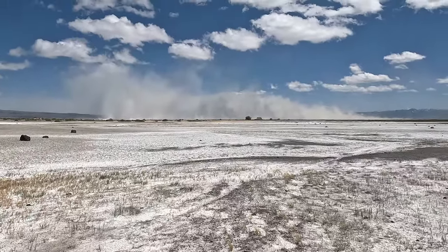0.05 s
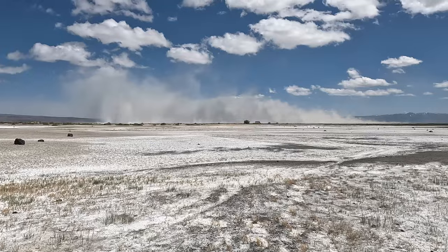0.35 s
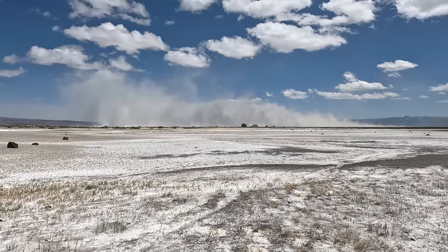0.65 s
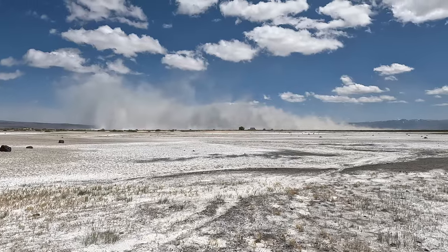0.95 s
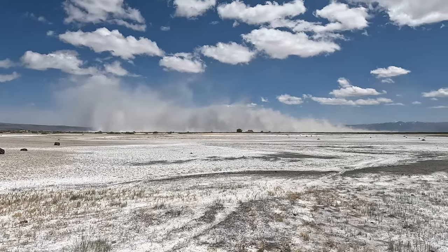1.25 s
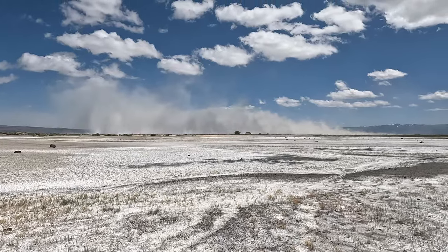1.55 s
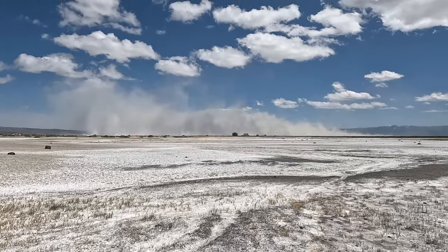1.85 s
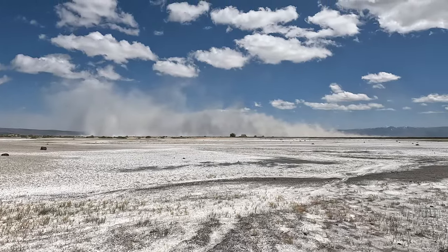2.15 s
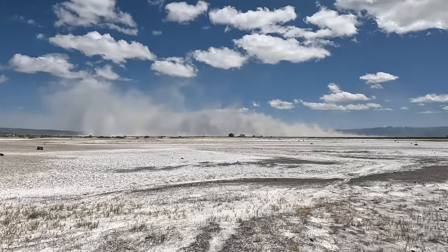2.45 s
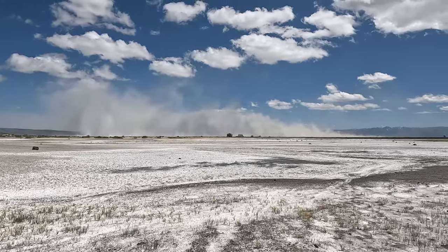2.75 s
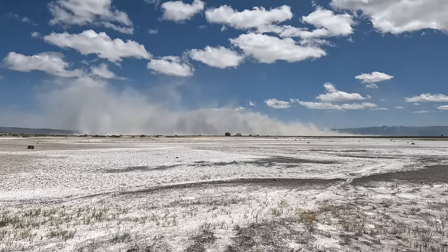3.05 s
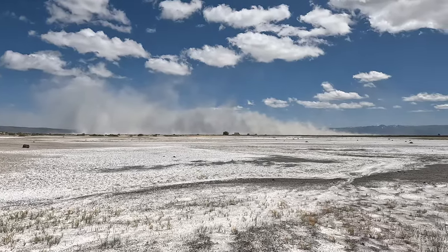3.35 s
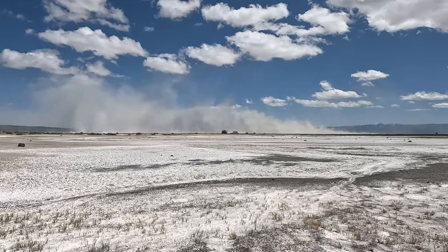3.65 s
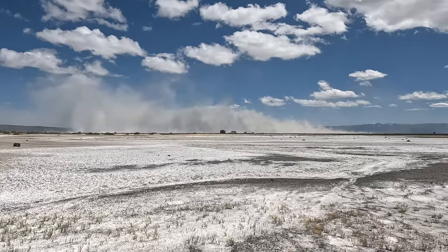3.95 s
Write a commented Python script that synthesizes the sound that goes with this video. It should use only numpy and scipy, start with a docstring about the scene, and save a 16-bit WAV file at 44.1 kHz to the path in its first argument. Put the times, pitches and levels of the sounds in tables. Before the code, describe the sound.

Someone walks over a brittle salt crust, each step crunching, with wind rumbling on the microphone.

```python
"""A dry salt flat in gusty wind, heard from a walker's small hand-held stereo recorder.
From the start, wind rumbles on the microphone ports and single eddies hit them with brighter buffets.
Steady steps follow just below: each crushes the crust into a crunch of tiny fractures, with sharper
snaps and a hiss of grit, and the trailing foot scuffs off. The wind slackens around the heavy third
step, gusts again, and eases after the heavy sixth."""
import sys
import numpy as np
from scipy import signal
from scipy.fft import rfft, irfft
from scipy.io import wavfile
from scipy.ndimage import uniform_filter1d, map_coordinates

SR = 44100
rng = np.random.default_rng(int(sys.argv[2]) if len(sys.argv) > 2 else 0)


def int16_out(signal):
    """Quantize to a 16-bit WAV file."""
    q = np.round(np.clip(np.atleast_2d(signal).T, -1, 1) * 32767)
    wavfile.write(sys.argv[1], SR, q.astype(np.int16))


N = 176400

# heel or forefoot crushes the crust:
# start t/s, attack/s, hold/s, release/s, crunch level/dB, grit level/dB, grit's treble boost/dB
FOOT_CONTACTS = [(0.256, 0.062, 0.05, 0.13, -43.5, -58, -8), (0.943, 0.012, 0.048, 0.039, -44, -56, -3),
                 (1.048, 0.023, 0.041, 0.052, -44, -57.5, -11),
                 (1.598, 0.043, 0.034, 0.0043, -38.5, -51, -4),
                 (1.69, 0.0024, 0.054, 0.05, -44.5, -58.5, -7),
                 (2.251, 0.0016, 0.0063, 0.061, -47.5, -62, -2),
                 (2.897, 0.011, 0.095, 0.038, -43.5, -57, -1.5),
                 (3.279, 0.0059, 0.0053, 0.0097, -65, -67.5, 14.5),
                 (3.535, 0.023, 0.12, 0.071, -38.5, -51.5, -23)]
# the sole rolls and the trailing foot scuffs off: start t/s, length/s, crunch level/dB, grit level/dB
FOOT_SCUFFS = [(0.01, 0.25, -61, -79), (0.465, 0.072, -48, -73.5), (0.583, 0.11, -60, -66),
               (.7, 0.35, -72, -77.5), (1.164, 0.17, -57, -72.5), (1.352, 0.1, -62, -79),
               (1.589, 0.018, -55, -57.5), (1.885, 0.15, -65, -66.5), (2.05, 0.087, -58.5, -68.5),
               (2.284, 0.052, -50.5, -70), (2.329, .29, -56.5, -71), (2.658, 0.22, -72, -78),
               (3.08, 0.13, -51.5, -71), (3.192, 0.25, -60, -67), (3.442, 0.17, -63, -71.5),
               (3.748, 0.076, -75, -59.5), (3.856, 0.093, -63, -64)]
# plates of crust snap: t/s, pulse level/dB, f/Hz, edge level/dB
PLATE_SNAPS = [(0.051, -25.5, 1410, -61), (0.078, -35.5, 1550, -77), (0.21, -36, 1550, -63),
               (.28, -32, 1500, -73.5), (.308, -40, 1400, -53), (.371, -17, 1004, -49),
               (.38, -39, 1900, -49), (.436, -17, 1110, -45), (.487, -34, 1970, -69),
               (.528, -34, 1550, -60), (.957, -48, 1500, -49), (.989, -22, 1010, -66),
               (1.0444, -22.5, 1090, -51.5), (1.067, -19.5, 1050, -58), (1.115, -40, 2130, -59),
               (1.123, -23.5, 1150, -59), (1.139, -36, 1900, -49), (1.283, -41.5, 2280, -48.5),
               (1.378, -32, 1220, -61), (1.443, -36.5, 1450, -68), (1.631, -24, 1330, -53),
               (1.654, -27, 1690, -40), (1.661, -41, 2500, -47), (1.671, -28.5, 2820, -42),
               (1.692, -29, 1990, -45), (1.729, -28.5, 1700, -56), (2.254, -51, 1600, -48.5),
               (2.28, -24.5, 1210, -58), (2.299, -32.5, 1190, -58), (2.512, -33, 1900, -50),
               (2.6, -30.5, 1210, -63), (2.637, -31, 1400, -58), (2.779, -42.5, 2700, -72),
               (2.926, -27.5, 1470, -65), (2.994, -13, 1100, -59), (3.094, -34, 1250, -52),
               (3.348, -40, 1900, -51.5), (3.403, -22, 1110, -57), (3.559, -33, 2500, -53),
               (3.622, -25.5, 740, -61), (3.639, -18, 980, -48), (3.662, -26, 2700, -60),
               (3.677, -27.5, 1250, -64), (3.717, -30, 2010, -57), (3.755, -27, 1310, -65),
               (3.783, -29.5, 2160, -60), (3.906, -31.5, 1520, -56)]
# spectra of the crunch, the grit and a snap's sharp edge: f/Hz, relative level/dB
CRUNCH_SPECTRUM = [(150, -36), (400, 3), (650, 1), (1000, 6), (1350, 4), (2100, -10), (3000, -14.5),
                   (5000, -33.5), (9000, -45), (15000, -62)]
GRIT_SPECTRUM = [(500, -25), (1500, -4), (2800, 0), (4200, -3.5), (5500, -8), (7300, -11), (8800, -20),
                 (10500, -24), (12300, -24), (14500, -42)]
EDGE_SPECTRUM = [(1200, -14), (2700, 2), (4200, 0), (7300, -7), (8600, -20), (14000, -42)]
# the feet at the right port against the left: f/Hz, level/dB
RIGHT_PORT_SHADE = [(200, 2), (500, -1), (900, -7), (2500, -8), (4000, -6.5), (5300, -2), (7500, -4),
                    (12000, -7)]
# how far the left port leads the right, for feet and for eddies: f/Hz, phase/rad
FEET_LEAD = [(100, 0), (780, -.7), (2400, -.8), (3800, 0), (5400, .4), (9000, .8)]
EDDY_LEAD = [(0, 0.34), (260, -1.08), (860, -1.83), (4000, 0.17)]
# eddies hit the ports:
# peak t/s, half length/s, right port level/dB, treble tilt/(dB per octave), left minus right/dB
EDDIES = [(0.01, 0.0033, -15.5, -0.5, -8.5), (0.053, 0.0049, -18.5, -14, -9),
          (0.079, 0.0065, -16.5, -5, -16), (0.111, 0.0073, -18, 3, -12), (0.337, 0.013, -17, -2.5, -9.5),
          (0.394, 0.016, -18, 0.5, -10.5), (0.718, 0.015, -23.5, -21.5, -11.5),
          (0.848, 0.0035, -17, -5, -7.5), (0.854, 0.0021, -19, -7.5, -3.5), (1.206, 0.013, -19, 2.5, -4.5),
          (1.234, .009, -21, -2, -8), (1.637, 0.0078, -26, -2.5, -1.5), (1.692, 0.0048, -23.5, -8, -9),
          (2.027, 0.0089, -22, -3, 1), (2.044, 0.0034, -19, -0.5, -11), (2.09, 0.0033, -20.5, -1.5, -6),
          (2.361, 0.013, -26.5, -18.5, -5.5), (2.391, 0.014, -22.5, -2.5, -10),
          (2.445, 0.015, -20, -10.5, -4), (2.474, 0.015, -22.5, 1.5, -4.5), (2.518, 0.026, -27.5, -7, -8),
          (2.815, 0.0087, -18.5, 3, -2), (2.835, 0.013, -20.5, -5, -20), (2.868, 0.0051, -15, -2.5, -7),
          (2.9, 0.023, -26.5, -2.5, -7.5), (2.972, 0.0056, -15.5, -12.5, -9),
          (3.008, 0.0077, -17.5, 1.5, -12), (3.054, 0.021, -16, -1, -12),
          (3.185, 0.0077, -20.5, -20.5, -14), (3.38, 0.0035, -16.5, -1.5, -14.5),
          (3.403, 0.007, -18, 2, -5), (3.427, 0.008, -20, 2.5, -4), (3.445, 0.018, -23.5, -2.5, -4),
          (3.487, 0.0079, -30, -6.5, -5), (3.98, 0.0089, -24.5, -13, -7.5)]
# gusts on the ports, as deep rumble and as low-mid flutter: t/s, relative level/dB
RUMBLE_GUSTS = [(0, -20.5), (.9, -22.5), (1.0, -26.5), (1.2, -19.5), (1.28, -28), (1.37, -20), (1.45, -41),
                (1.53, -23.5), (1.59, -38), (1.7, -22), (1.76, -34.5), (1.85, -27), (1.91, -19.5),
                (2.06, -19.5), (2.15, -25.5), (2.3, -32.5), (2.39, -18), (2.67, -19), (2.75, -30),
                (2.83, -19), (3.07, -32), (3.13, -32.5), (3.185, -19), (3.25, -27.5), (3.33, -21),
                (3.5, -27.5), (3.78, -31.5), (3.86, -24), (4, -39)]
FLUTTER_GUSTS = [(0, -30), (.45, -31.5), (.65, -37.5), (.9, -31), (1.05, -35.5), (1.33, -34.5),
                 (1.45, -52.5), (1.58, -49), (1.68, -44), (1.8, -48.5), (2.0, -38), (2.22, -50.5),
                 (2.45, -43), (2.66, -44), (2.78, -45.5), (3.0, -47.5), (3.13, -45), (3.45, -39.5),
                 (3.6, -38.5), (3.8, -44.5), (4, -56)]
# spectra of the wind at the microphone and of the open air: f/Hz, relative level/dB
BUFFET_SPECTRUM = [(30, 5), (120, 3.5), (260, 3), (420, -1.5), (700, -8), (1000, -15.5), (1500, -32),
                   (2300, -45.5), (4000, -61), (9000, -83.5)]
RUMBLE_SPECTRUM = [(8, -14.5), (22, 12), (42, 1), (80, -2.5), (120, -17), (200, -20), (400, -40),
                   (1000, -87.5)]
FLUTTER_SPECTRUM = [(50, -16), (110, 2), (160, -5.5), (260, -11), (400, -18.5), (700, -32.5), (1500, -58.5),
                    (4000, -95.5)]
AIR_SPECTRUM = [(200, 16.5), (600, -0.5), (1200, -0.5), (2200, -6), (3500, -18), (7000, -20.5), (9000, -39),
                (14000, -56.5)]

SCUFF_FADE_S, GRIT_LEAD_S, SPARKLE_HZ = .04, .0022, 5000
SNAP_CYCLES, SPLINTER_S, DEBRIS_DB, DEBRIS_S = .5, .0009, -32.5, .0013


def footfalls():
    """Crust crunches and grit hisses under each step and scuff; stray crumbs and sand tick between."""
    t = np.arange(N) / SR
    crunch, grit, sparkle = np.zeros((3, N))
    for start, attack, hold, release, crunch_db, grit_db, sparkle_db in FOOT_CONTACTS:
        crunch += undb(crunch_db) * sole_pressure(t - start, attack, hold, release)
        lead = min(GRIT_LEAD_S, attack / 2)
        touch = undb(grit_db) * sole_pressure(t - start + lead, attack, hold, release)
        grit += touch
        sparkle += undb(sparkle_db) * touch
    for start, length, crunch_db, grit_db in FOOT_SCUFFS:
        drag = np.clip(np.minimum(t - start, start + length - t) / SCUFF_FADE_S + .5, 0, 1)
        crunch = np.hypot(crunch, undb(crunch_db) * drag)
        grit, sparkle = np.hypot([grit, sparkle], undb(grit_db) * drag)
    coarse = fractures(CRUNCH_SPECTRUM, density=1300, scatter_db=3)
    fine = fractures(GRIT_SPECTRUM, density=3600, scatter_db=3)
    treble = signal.sosfiltfilt(signal.butter(2, SPARKLE_HZ, "high", fs=SR, output="sos"), fine)
    jerks = unit(undb(1.8 * wander(per_s=150)))  # the crust gives way unevenly
    crumbs = undb(-63) * fractures(CRUNCH_SPECTRUM, density=31, scatter_db=-9.5)
    sand = undb(-80) * fractures(GRIT_SPECTRUM, density=450, scatter_db=3)
    return jerks * (crunch * coarse + grit * (fine - treble) + sparkle * treble) + crumbs + sand


def sole_pressure(t, attack, hold, release, settle_db=-28.5, settle_s=.036):
    """The sole comes down, bears weight, and the crumbs settle."""
    rise = np.clip(t / max(attack, 1e-3), 0, 1)
    after = np.maximum(t - attack - hold, 0)
    return rise * (np.exp(-after / release) + undb(settle_db) * np.exp(-after / settle_s))


def fractures(spectrum, density, scatter_db):
    """Tiny fractures: one-cycle clicks of random size in six bands, more frequent in the higher ones."""
    f = np.maximum(np.fft.rfftfreq(N, 1 / SR), 1)
    bands = np.geomspace(600, 8000, 6)
    out = 0
    for hz in bands:
        breaks = rng.random(N) < density / len(bands) / SR * np.sqrt(hz / 1000)
        size = undb(scatter_db * np.minimum(rng.exponential(size=N), np.pi))
        sign = np.sign(rng.standard_normal(N))
        band = np.exp(-(np.log2(f / hz) / .65) ** 2) / (hz / 1000) ** .25
        out = out + rfft(breaks * sign * size) * band
    return unit(colour(irfft(out, N), spectrum))


def snaps():
    """Each plate breaks with a short pulse, a sharp click that splinters away and a spray of debris."""
    t = np.arange(-256, 4096) / SR
    out = np.zeros(N + 8192)
    click = colour(1. * (t == 0), EDGE_SPECTRUM)
    for start, db, hz, edge_db in PLATE_SNAPS:
        phase = rng.uniform(0, 2 * np.pi)
        edge_noise, debris_noise = rng.standard_normal((2, len(t)))
        width = SNAP_CYCLES * np.where(t < 0, 1, 1.97)
        pulse = np.exp(-(t * hz / width) ** 2) * np.cos(2 * np.pi * hz * t + phase)
        splinters = (t > 0) * np.exp(-np.abs(t) / SPLINTER_S) * unit(colour(edge_noise, EDGE_SPECTRUM))
        edge = undb(edge_db) * (2 * click / click.max() + splinters)
        spray = undb(DEBRIS_DB) * np.clip(t * hz, 0, 1) * np.exp(-np.abs(t) / DEBRIS_S)
        debris = spray * unit(colour(debris_noise, CRUNCH_SPECTRUM))
        at = int((start + t[0]) * SR)
        out[at:at + len(t)] += undb(db) * (pulse + debris) + edge
    return out[:N]


def ground_to_microphone(feet, scatter_db=-9, scatter_s=.012, left_lag_s=1e-5):
    """The left port faces the feet; legs and rough ground scatter a little sound to both."""
    t = np.arange(2048) / SR
    tail = rng.standard_normal((2, len(t))) * np.exp(-t / scatter_s) * (t > .001)
    tail = undb(scatter_db) * unit(tail) / np.sqrt(len(t))
    direct = map_coordinates(feet, [np.arange(N) - left_lag_s * SR])
    left = direct + signal.fftconvolve(feet, tail[0])[:N]
    right = colour(feet + signal.fftconvolve(feet, tail[1])[:N], RIGHT_PORT_SHADE)
    return stagger([left, right], FEET_LEAD)


def buffets(flicker_db=4, split_hz=350):
    """Each eddy is a ragged burst of turbulence right on the ports, bright only near its peak."""
    t = np.arange(N) / SR
    out = np.zeros((2, N))
    noise = port_noise(shared=.8)
    flicker = undb(flicker_db * wander(per_s=240))
    lowpass = signal.butter(2, split_hz, fs=SR, output="sos")
    for peak, half, db, tilt_db, left_db in EDDIES:
        near = np.abs(t - peak) < .1
        lag = t[near] - peak
        width = half * np.where(lag < 0, .8, 1)  # rises faster than it falls
        swell = np.exp(-.5 * (lag / width) ** 2)
        rush = colour(noise[:, near], BUFFET_SPECTRUM, tilt_db)
        low = signal.sosfiltfilt(lowpass, rush)
        burst = low * swell + (rush - low) * swell ** 2.6 * flicker[near]
        out[:, near] += unit(burst) * np.sqrt(np.mean(swell ** 2)) * undb([[db + left_db], [db]])
    return stagger(out, EDDY_LEAD)


def wind_rumble(steady_s=.09):
    """Deep wind noise on the ports, its chance swells evened out so that the gusts shape it."""
    noise = colour(port_noise(shared=.61), RUMBLE_SPECTRUM)
    power = uniform_filter1d(np.mean(noise ** 2, axis=0), int(steady_s * SR))
    return noise / np.sqrt(power + 1e-24) * curve(RUMBLE_GUSTS) * port_gains(db=-1, pan_db=1.5)


def wind_flutter(wander_db=4.5):
    """Wind flutters unevenly in the low mids, harder on the right port."""
    noise = colour(port_noise(shared=.63), FLUTTER_SPECTRUM)
    flutter = unit(noise * undb(wander_db * wander(per_s=40)))
    return flutter * curve(FLUTTER_GUSTS) * port_gains(db=-2, pan_db=-10.5)


def open_air(wander_db=2.5):
    """The faint, wide hiss of the air over the flat."""
    hiss = unit(colour(port_noise(shared=.067), AIR_SPECTRUM))
    return hiss * undb(wander_db * wander(per_s=5.28)) * port_gains(db=-58, pan_db=5)


def port_noise(shared):
    """One noise for each port, with a fraction of their power in common."""
    return np.sqrt(shared) * rng.standard_normal(N) + np.sqrt(1 - shared) * rng.standard_normal((2, N))


def port_gains(db, pan_db):
    """Left and right gains around db, the left higher by pan_db."""
    return undb([[db + pan_db / 2], [db - pan_db / 2]])


def stagger(pair, points):
    """Make the right port lag the left by (f/Hz, phase/rad) points."""
    hz, radians = np.array(points, float).T
    lag = np.interp(np.fft.rfftfreq(N, 1 / SR), hz, radians)
    return np.array([pair[0], irfft(rfft(pair[1]) * np.exp(-1j * lag), N)])


def colour(x, points, tilt_db=0):
    """Filter by (f/Hz, level/dB) points, plus tilt_db per octave from 300 to 2400 Hz."""
    size = x.shape[-1]
    f = np.maximum(np.fft.rfftfreq(size, 1 / SR), 1)
    hz, db = np.array(points, float).T
    tilt = tilt_db * np.clip(np.log2(f / 300), 0, 3)
    return irfft(rfft(x) * undb(np.interp(np.log(f), np.log(hz), db) + tilt), size)


def curve(points):
    """Gain along (t/s, level/dB) points."""
    times, db = np.array(points, float).T
    return undb(np.interp(np.arange(N) / SR, times, db))


def wander(per_s):
    """Random drift with a spread near 1."""
    knots = rng.standard_normal(1024)
    return np.sqrt(3 / 2) * np.interp(np.arange(N) / SR * per_s, np.arange(len(knots)), knots)


def undb(db):
    """Decibels to gain."""
    return 10 ** (np.asarray(db) / 20)


def unit(x):
    """Scale to rms 1."""
    return x / np.sqrt(np.mean(x ** 2, axis=-1, keepdims=True) + 1e-24)


def scene():
    """Feet on the crust close below, wind on the microphone, open air all around."""
    feet = ground_to_microphone(footfalls() + snaps())
    return feet + wind_rumble() + wind_flutter() + open_air() + buffets()


def record(dry):
    """The recorder cuts the top above 14.9 kHz."""
    return signal.sosfilt(signal.ellip(8, .2, 70, 14900, fs=SR, output="sos"), dry)


dry = scene()
out = record(dry)
int16_out(out)
```